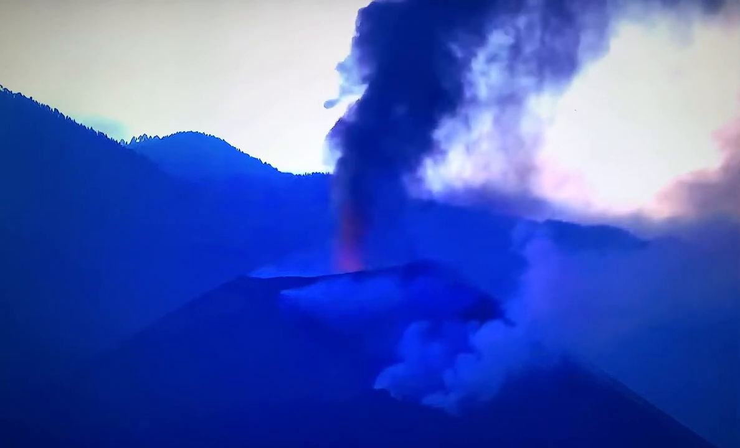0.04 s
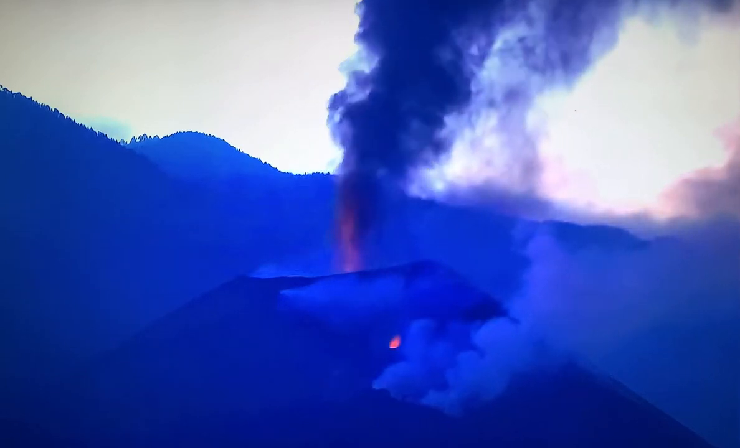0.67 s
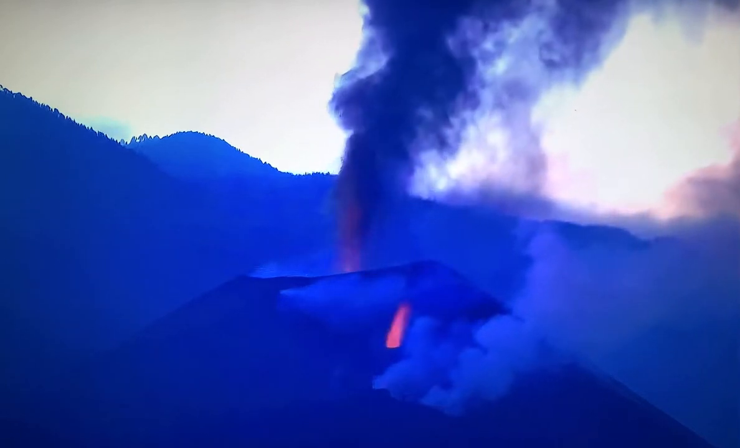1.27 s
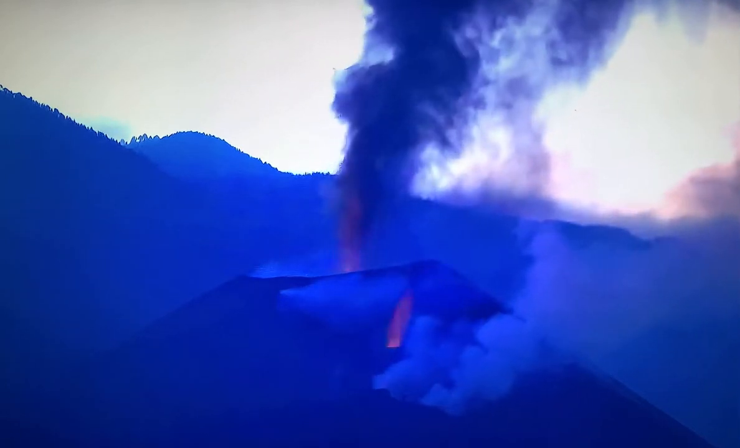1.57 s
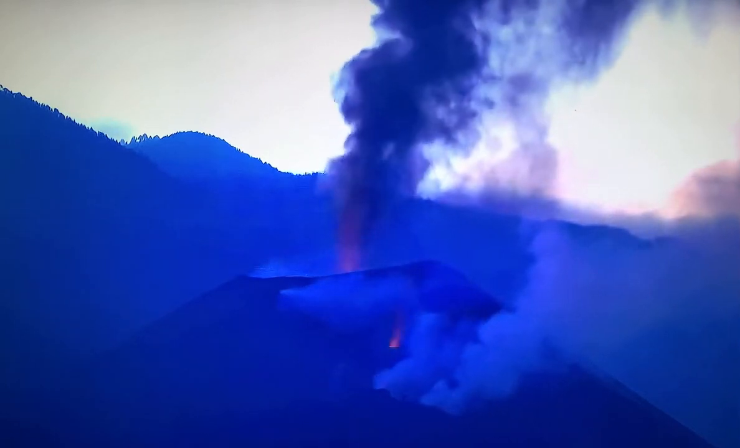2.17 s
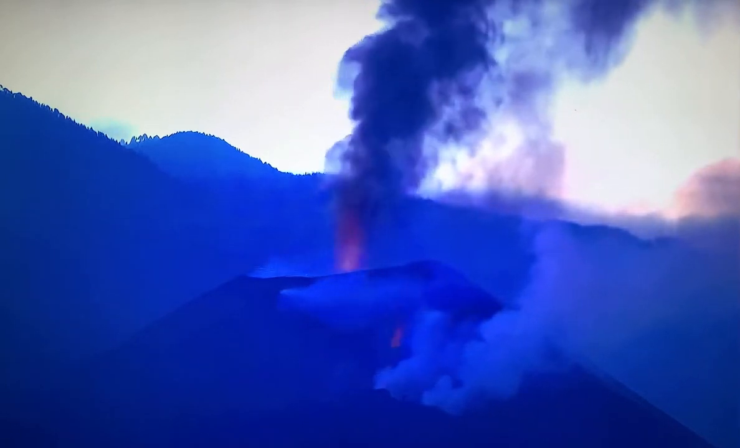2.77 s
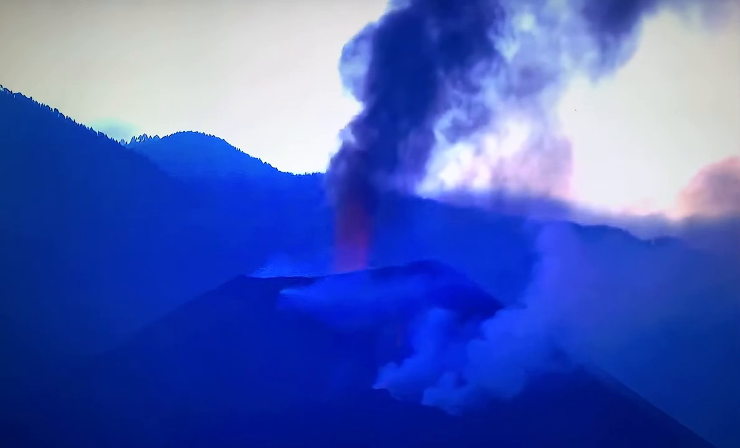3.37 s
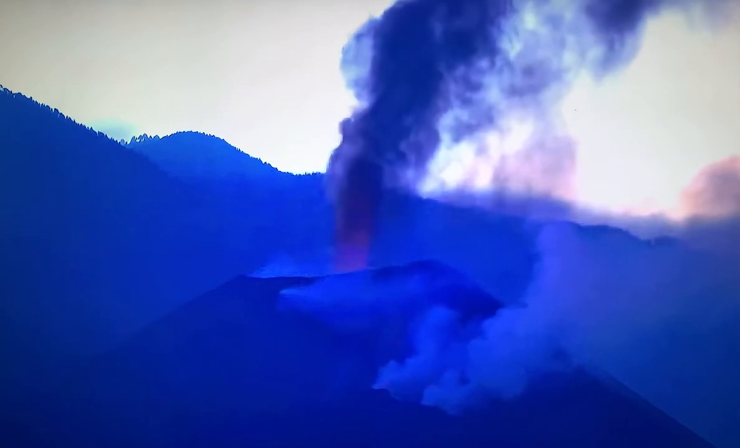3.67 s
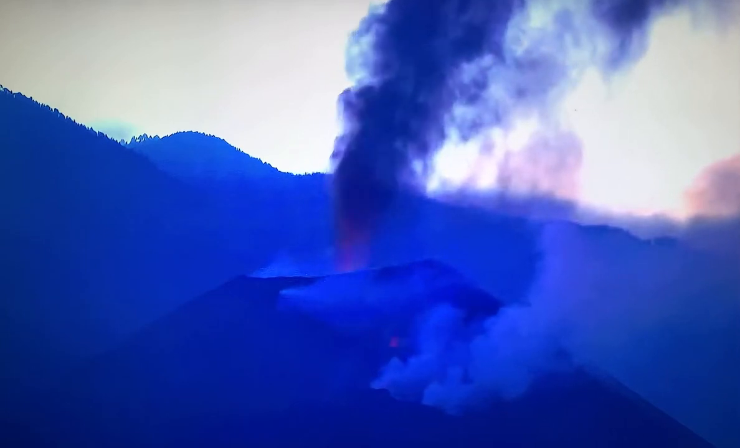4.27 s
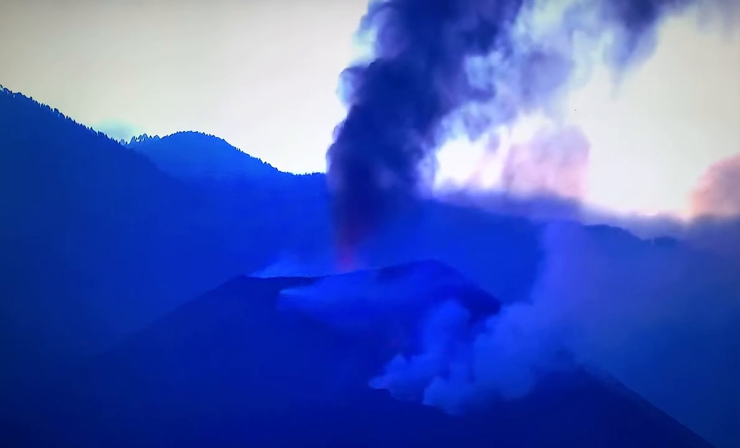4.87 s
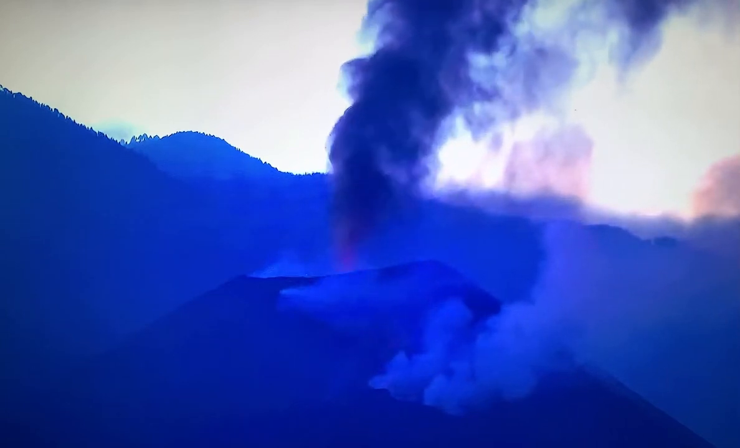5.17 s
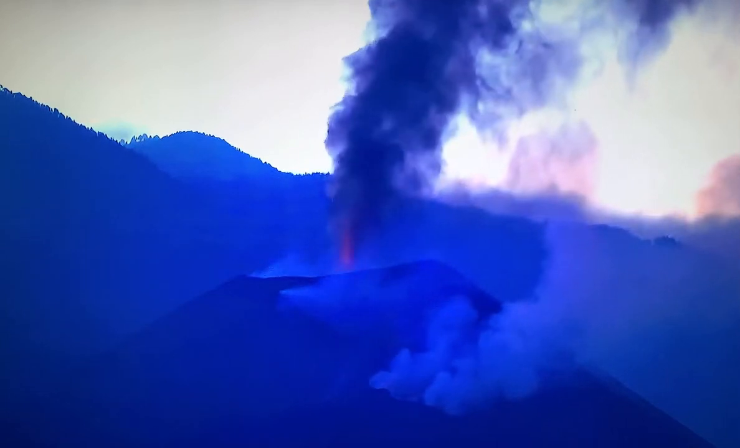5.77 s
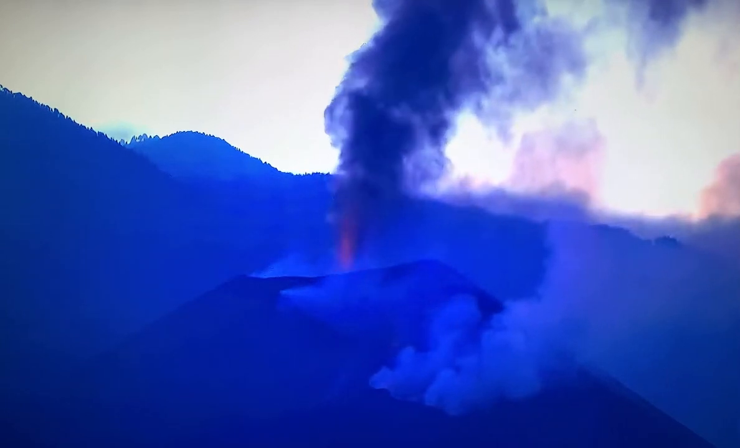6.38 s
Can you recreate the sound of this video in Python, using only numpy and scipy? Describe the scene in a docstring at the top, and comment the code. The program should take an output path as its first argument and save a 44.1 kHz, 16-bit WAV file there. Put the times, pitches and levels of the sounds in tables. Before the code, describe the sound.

Heard outdoors from a long way off, an erupting volcano rumbles in irregular low pulses beneath a muffled roar. The roar gradually sinks while the throbbing carries on. Then both build to their loudest, the roar turning a little brighter, and several gas bursts land as dull thuds. A faint, even microphone hiss runs throughout.

```python
"""A low, throbbing rumble and a dull roar ebb, then swell strongly with a few thuds: a distant volcano.
Vent pressure and the churning plume drive the rumble, the gas jet the roar, single gas bursts the thuds.
All arrive coloured by the fixed resonances of the listening place.
A thin steady hiss and a few faint swishes lie above them."""
import sys
import numpy as np
from scipy import signal
from scipy.fft import rfft, irfft, next_fast_len
from scipy.io import wavfile
from scipy.ndimage import uniform_filter1d, map_coordinates

SR = 44100
rng = np.random.default_rng(int(sys.argv[2]) if len(sys.argv) > 2 else 0)


def digitize_waveform(pressure):
    """Quantize a signal to 16-bit integers and store it at the path in sys.argv[1].

    Rows of a 2-D input are taken as channels; values are limited to [-1, 1].
    """
    field = np.atleast_2d(pressure).T
    bounded = np.clip(field, -1, 1)
    quanta = np.round(bounded * 32767).astype(np.int16)
    wavfile.write(sys.argv[1], SR, quanta)


N = 292824
TIME_S = np.arange(N) / SR
EARS = np.array([[.5], [-.5]])  # left, right share of a left-minus-right value


def amp(db):
    """Decibels to gain."""
    return 10 ** (np.asarray(db) / 20)


def unit(x):
    """x at rms 1."""
    return x / np.sqrt(np.mean(x ** 2) + 1e-20)


def along(points, hz):
    """(f/Hz, value) points read on a log axis."""
    f, values = np.transpose(points)
    return np.interp(np.log(hz + 1), np.log(f + 1), values)


def curve(points):
    """(t/s, value) points read at every sample."""
    return np.interp(TIME_S, *np.transpose(points))


def bell(at_s, sigma_s):
    """Gaussian swell of height 1."""
    return np.exp(-.5 * ((TIME_S - at_s) / sigma_s) ** 2)


def wobble(rate_hz):
    """Smooth random curve, rate_hz knots a second."""
    knots = rng.standard_normal(int(N * rate_hz / SR) + 4)
    return map_coordinates(knots, [TIME_S * rate_hz])


def filtered(x, response):
    """x through a complex frequency response."""
    size = next_fast_len(N + SR // 2)
    return irfft(rfft(x, size) * response(np.fft.rfftfreq(size, 1 / SR)), size)[..., :N]


def band(hz, low_hz, high_hz, order=8):
    """Gain of a steep band-pass."""
    return ((1 + (low_hz / (hz + 1)) ** (2 * order)) * (1 + (hz / high_hz) ** (2 * order))) ** -.5


def resonances(modes, hz):
    """Gain of steep-sided resonances, each (f/Hz, width/Hz, level/dB)."""
    return np.sqrt(sum((amp(db) / (1 + (2 * (hz - f) / width) ** 2)) ** 2 for f, width, db in modes))


def noise_pair(colour, coherence, lead_rad):
    """Stereo noise of rms 1 with a spectrum, a left-right coherence and a left-ear phase lead."""
    def mid_side_gains(hz):
        angle = np.arccos(np.clip(along(coherence, hz), -1, 1)) / 2
        return np.array([np.cos(angle), np.sin(angle)])
    mid, side = filtered(rng.standard_normal((2, N)), mid_side_gains)
    pair = np.array([mid + side, mid - side])
    return unit(filtered(pair, lambda hz: colour(hz) * np.exp(1j * EARS * lead_rad(hz))))


# hiss spectrum: f/Hz, level/dB
HISS_SPECTRUM = [(20, 5), (300, 6.5), (2300, 2.5), (4300, 2.5), (7000, 0), (10000, -1.5), (14500, -2.5)]
# hiss between the ears: f/Hz, coherence
HISS_COHERENCE = [(2000, 0.027), (4000, 0.049), (7000, .35), (10000, 1), (14000, 0.99)]

def hiss(level_db=-81.0, lag_ms=0.2935):
    """Thin, steady hiss: slightly earlier at the right ear, slightly fuller at the left."""
    def colour(hz):
        left_db = along([(5000, 3.2), (8500, .1)], hz)
        return amp(along(HISS_SPECTRUM, hz) + EARS * left_db)
    return amp(level_db) * noise_pair(colour, HISS_COHERENCE, lambda hz: -2 * np.pi * hz * lag_ms / 1000)


# swishes: t/s, level/dB, sigma/s, f/Hz, width/Hz
SWISHES = [(1.02, -85.5, 0.028, 6560, 3000), (1.407, -84, 0.052, 6400, 4200),
           (4.208, -86.5, .014, 6050, 1200)]

def swishes(low_hz=2200, high_hz=8000):
    """Brief, faint swells of high noise, each in its own band."""
    air = noise_pair(lambda hz: band(hz, low_hz, high_hz), [(6000, 0.45)], np.zeros_like)
    out = np.zeros((2, N))
    for at_s, db, sigma_s, centre_hz, width_hz in SWISHES:
        swish = unit(filtered(air, lambda hz: resonances([(centre_hz, width_hz, 0)], hz)))
        out += amp(db) * bell(at_s, sigma_s) * swish
    return out


# eruption between the ears: f/Hz, coherence
FAR_COHERENCE = [(60, 0.96), (130, 1), (450, 0.98), (700, 0.88), (1300, 0.83), (2000, 0.55)]
# phase lead of the left ear: f/Hz, lead/rad
FAR_LEAD = [(60, -.05), (130, -0.12), (250, -0.17), (470, -.15), (560, 0.17), (680, 0.46), (850, 0.89),
            (1050, 0.57), (1250, 0.33), (1400, 0.76), (1900, -0.12)]

def turbulence(colour, even_s):
    """Far turbulence: flutters freely, but its power is even over spans longer than even_s."""
    noise = noise_pair(colour, FAR_COHERENCE, lambda hz: along(FAR_LEAD, hz))
    size = int(even_s * SR)
    power = uniform_filter1d(uniform_filter1d(np.mean(noise ** 2, axis=0), size), size)
    return unit(noise / np.sqrt(np.abs(power) + 1e-6))


def drifting(x, depth_db):
    """Moving air lets neighbouring resonances wax and wane independently."""
    spectra = signal.stft(x, nperseg=2048)[2]
    patches = uniform_filter1d(rng.standard_normal(spectra.shape[1:]), size=4, axis=0)
    patches = uniform_filter1d(patches, size=12, axis=1)
    patches -= uniform_filter1d(patches, size=14, axis=0)  # keeps the broad spectrum steady
    return unit(signal.istft(spectra * amp(depth_db * unit(patches)))[1][:, :N])


# higher resonances of the place: f/Hz, width/Hz, level/dB, left minus right/dB
HIGH_MODES = [(356, 29, -12.5, -0.3), (383.3, 15, -1, 0), (398.5, 14, -2, 1.5), (427, 33, -8, -2),
              (468.4, 37, -7, 5.5), (536, 32, -3.5, -2.5), (583, 28, -2.5, 1.5), (600.5, 33, -5.5, -2.5),
              (643.4, 41, -5, -2.5), (695, 27, 0.5, -2.5), (745.8, 35.3, -3, -1), (785, 17, -12.5, -3),
              (839, 34, -9, -1.5), (863, 47, -15.5, -1.5), (940, 28, -12, 1.2), (1016, 50, -19.5, -1),
              (1070, 28, -18, 4), (1152, 42, -16.5, 0), (1187.5, 31, -17, 12), (1255, 56, -15.5, 8.5),
              (1315, 36, -14, -2.5), (1359, 18, -14.5, 4.5), (1398, 44, -16, 4.5), (1474, 39, -20, -2.5),
              (1548, 99, -28.5, 12.5), (1640, 120, -33.5, 5.5), (1750, 46, -32, 7.5),
              (1884, 240, -35.5, 7.5), (2060, 250, -31.5, 0.5)]
# gas jet strength: t/s, level/dB
JET_LEVEL = [(0, -56.5), (0.1, -58), (0.68, -58), (0.77, -56.5), (0.87, -56.5), (1.1, -57.6), (1.35, -60.5),
             (1.43, -63.0), (1.52, -59.5), (1.78, -62.5), (1.95, -61.5), (2.35, -62.5), (2.62, -64.5),
             (2.74, -60), (2.9, -65.5), (3.08, -60.6), (3.31, -59), (3.43, -65), (3.57, -62.5), (3.7, -66),
             (3.98, -65.5), (4.22, -64), (4.4, -65.4), (4.62, -64.2), (4.78, -61.1), (5.08, -60),
             (5.5, -55.5), (5.78, -51), (6.1, -54.5), (6.22, -50), (6.32, -53), (6.5, -49.2), (6.64, -52.5)]
# tilt of the roar's body: t/s, twice the treble-over-bass gain/dB
BODY_TILT = [(0, -3.5), (2, -2.5), (3, 0), (4.1, 2.5), (5.2, 3), (6.64, 1)]
# roar's upper edge, relative to the jet: t/s, level/dB
EDGE_LEVEL = [(0, -10.5), (1.1, -12.5), (1.9, -14.5), (3, -15.5), (4.1, -14.5), (5.2, -14.5), (5.9, -13.5),
              (6.64, -11.5)]
# bright rush of small eddies: t/s, level/dB
RUSH_LEVEL = [(0, -69.5), (0.15, -70.5), (0.8, -69.6), (1.17, -71.4), (1.33, -74.3), (1.52, -73.8),
              (1.8, -77), (2.3, -74.5), (2.8, -73.5), (3.05, -73.9), (3.22, -71.5), (3.32, -72.5),
              (3.42, -78.3), (3.55, -75.5), (3.68, -80.5), (3.9, -78.5), (4.15, -78), (4.42, -81.8),
              (4.8, -75), (5.08, -76), (5.25, -70), (5.52, -69.5), (5.78, -63.5), (5.95, -66.5),
              (6.15, -63), (6.28, -63), (6.45, -63), (6.64, -64)]

def jet_roar(foot_db=-7.5, body_db=-0.83, rush_trim_db=1.13, foot_hz=442, edge_hz=805):
    """The gas jet roars through the higher resonances; its small eddies add a brighter rush."""
    def place(hz):
        return np.array([resonances([(f, width, db + ear * pan) for f, width, db, pan in HIGH_MODES], hz)
                         for ear in EARS[:, 0]])
    def part(low_hz, high_hz, even_s):
        return turbulence(lambda hz: place(hz) * band(hz, low_hz, high_hz, order=16), even_s)
    foot = part(315, foot_hz, even_s=.13)
    body = drifting(part(foot_hz, edge_hz, even_s=.08), depth_db=1.7)
    treble = filtered(body, lambda hz: band(hz, 630, 2000, order=16))
    treble_db = curve(BODY_TILT) / 4
    body = amp(-treble_db) * (body - treble) + amp(treble_db) * treble
    edge = part(edge_hz, 990, even_s=.14)
    rush = drifting(part(995, 1940, even_s=.21), depth_db=2.1)
    gas = amp(foot_db) * foot + amp(body_db) * body + amp(curve(EDGE_LEVEL)) * edge
    jet_db = curve(JET_LEVEL) + 0.5 * wobble(22) + 1.1 * wobble(90)
    rush_db = curve(RUSH_LEVEL) + rush_trim_db + 1.2 * wobble(45)
    return amp(jet_db) * gas + amp(rush_db) * rush


# low resonances of the place: f/Hz, width/Hz, level/dB
LOW_MODES = [(53.8, 20, -19), (77.9, 19.7, -0.5), (91.9, 6.1, -4.5), (113.44, 12, 0.5), (145.5, 29, -11),
             (169.2, 12, -14), (197.4, 26, -14), (229.7, 34, -20), (263, 23, -30.5), (297.6, 58, -29)]

def low_turbulence(low_hz, high_hz, even_s):
    """Turbulence heard through one band of the low resonances."""
    return turbulence(lambda hz: resonances(LOW_MODES, hz) * band(hz, low_hz, high_hz), even_s)


def low_ring(scatter_db=1.0, attack_s=0.0033, decay_ratio=1.49):
    """One pressure pulse strikes all low resonances, dying faster than their widths imply; peak 1."""
    t = np.arange(SR // 4) / SR
    ring = np.zeros_like(t)
    for hz, width_hz, db in LOW_MODES:
        strength = amp(db + scatter_db * rng.standard_normal()) * width_hz
        ring += strength * np.exp(-np.pi * decay_ratio * width_hz * t) * np.sin(2 * np.pi * hz * t)
    ring *= (1 - np.exp(-t / attack_s)) ** 2
    return ring / np.abs(ring).max()


# gas bursts: t/s, peak level before the band-pass/dB
BURSTS = [(4.961, -39.5), (5.673, -30), (6.164, -26.5), (6.395, -26.5), (6.499, -27.5)]

def thuds(low_hz=60, high_hz=230):
    """Each gas burst rings the low resonances as a short thud."""
    out = np.zeros(N + SR)
    for at_s, peak_db in BURSTS:
        ring = low_ring()
        out[round(at_s * SR):][:len(ring)] += amp(peak_db) * ring
    return filtered(out[:N], lambda hz: band(hz, low_hz, high_hz, order=4))


# plume churning: t/s, level/dB
PLUME_LEVEL = [(0, -58), (0.27, -57.5), (0.37, -63), (0.48, -59), (0.7, -60), (0.95, -56.5), (1.38, -57.5),
               (1.58, -62), (1.72, -62), (1.83, -65), (2.0, -60.5), (2.12, -65), (2.26, -56.5), (2.58, -62),
               (2.79, -64.5), (2.95, -65), (3.1, -58.5), (3.32, -64.5), (3.45, -64), (3.95, -67),
               (4.12, -67), (4.43, -68.1), (4.53, -64), (4.7, -65.5), (4.86, -57), (4.95, -64.5),
               (5.1, -59), (5.55, -56.1), (5.72, -50), (6.0, -55.5), (6.22, -49), (6.38, -49), (6.47, -53),
               (6.58, -48.5), (6.64, -52)]

def plume_churn(trim_db=-0.34):
    """The churning plume drives the resonances just above the vent's rumble."""
    return amp(curve(PLUME_LEVEL) + trim_db) * low_turbulence(142, 350, even_s=0.072)


# strongest vent throbs, relative to the rumble: t/s, level/dB
THROBS = [(0.241, 7), (0.521, 6), (0.746, 3.5), (0.952, 4.9), (1.042, 4.5), (1.124, 5.5), (1.335, 5),
          (1.388, 7), (1.735, 7.5), (2.044, 8.5), (2.3, 0), (2.36, 7), (2.48, 3.3), (2.555, 5), (2.661, 8),
          (2.803, 6.5), (2.885, 8.5), (3.151, 4.5), (3.32, 8), (3.502, 5.5), (3.932, 4.5), (4.435, 3),
          (4.564, 4), (4.845, 6.6), (4.881, 3), (4.972, 10.5), (5.15, 4.5), (5.295, 4.5), (5.355, 4),
          (5.445, 5.5), (5.49, 6), (5.58, 5.5), (5.83, 4.5), (5.9, 1.5), (6.141, 3), (6.25, 1), (6.616, 3)]

def throbbing_db(rise_s=0.024, fall_s=0.028, lull_db=2.5, lull_sigma_s=0.019, pulsing_db=1.23):
    """The vent throbs over weaker random pulsing and gives way while each burst escapes."""
    throbs_db = sum(db * bell(at_s, np.where(TIME_S < at_s, rise_s, fall_s)) for at_s, db in THROBS)
    lulls = sum(bell(at_s, lull_sigma_s) for at_s, _ in BURSTS)
    return throbs_db - lull_db * lulls + pulsing_db * wobble(rate_hz=31)


# vent pressure, heard as rumble: t/s, level/dB
VENT_LEVEL = [(0, -53), (0.65, -54.5), (0.85, -52.6), (1.2, -50.5), (1.47, -53.5), (1.63, -58.5),
              (1.85, -52.5), (1.94, -54.5), (2.13, -54), (2.26, -46.5), (2.6, -56.5), (2.97, -53.5),
              (3.22, -52), (3.42, -55), (3.6, -51), (3.82, -56), (4.1, -56.5), (4.72, -54), (5.06, -52),
              (5.26, -43.5), (5.6, -46), (6.0, -40.5), (6.3, -41), (6.64, -39)]
# rumble's lower band over its upper: t/s, level/dB
VENT_BALANCE = [(0.0, -2), (0.5, 6.5), (0.7, -4), (1.0, 2), (1.4, -4), (1.6, 2.5), (2.1, -5), (2.5, 4.0),
                (2.6, -5), (3.1, 6), (3.3, 1), (3.9, 3.5), (4.1, -0.5), (4.4, 2.5), (4.6, -2.5), (5.0, 3.5),
                (5.8, -3), (6.64, 6.5)]

def vent_rumble(split_hz=100.2, left_db=0.75):
    """The throbbing vent drives the deepest resonances, now the lower, now the upper."""
    lower = low_turbulence(30, split_hz, even_s=0.057)
    upper = low_turbulence(split_hz, 135.8, even_s=0.056)
    balance = amp(curve(VENT_BALANCE))
    rumble = (balance * lower + upper) / np.sqrt(1 + balance ** 2)
    return amp(curve(VENT_LEVEL) + throbbing_db() + EARS * left_db) * rumble


def scene():
    """The eruption under the hiss and swishes."""
    return vent_rumble() + plume_churn() + thuds() + jet_roar() + hiss() + swishes()


def record(dry, low_cut_hz=41, top_hz=14500):
    """The small microphone loses the deepest bass; the ends fade briefly and the top is band-limited."""
    fades = signal.windows.tukey(N, .0012)
    heard = fades * filtered(dry, lambda hz: (1 + (low_cut_hz / (hz + 1)) ** 8) ** -.5)
    return filtered(heard, lambda hz: hz < top_hz)


dry = scene()
out = record(dry)
digitize_waveform(out)
```